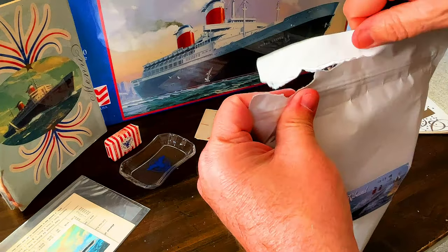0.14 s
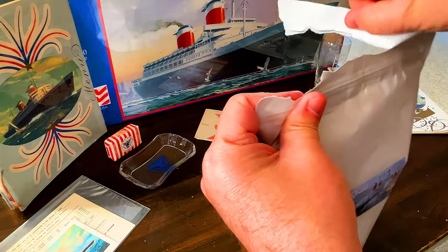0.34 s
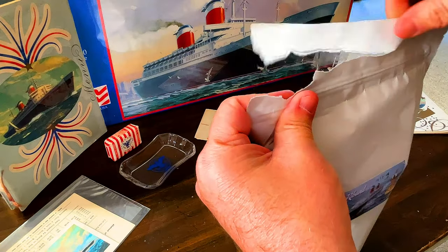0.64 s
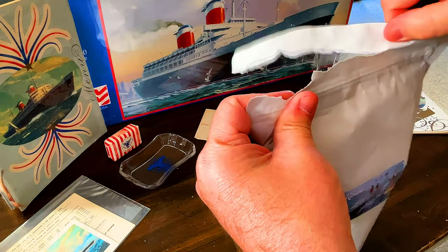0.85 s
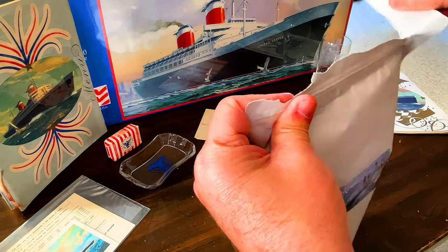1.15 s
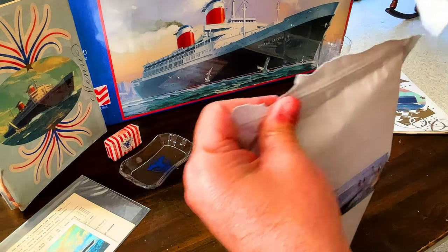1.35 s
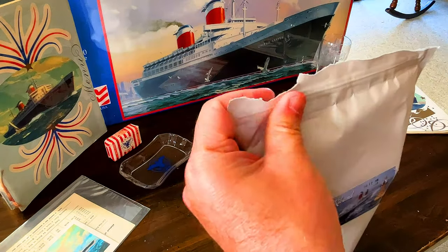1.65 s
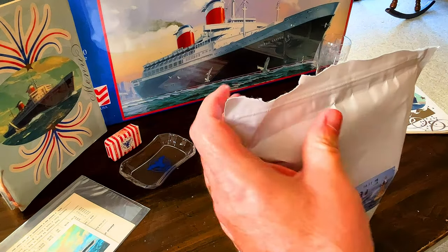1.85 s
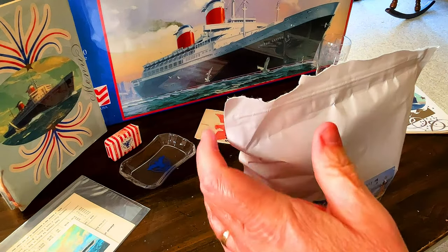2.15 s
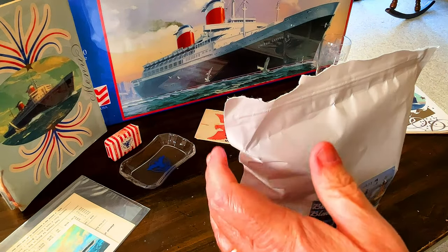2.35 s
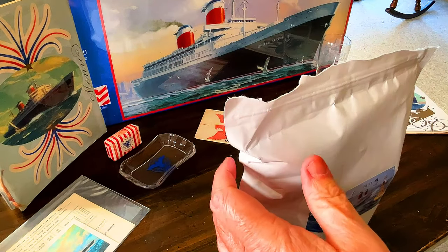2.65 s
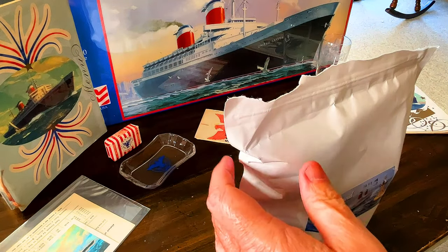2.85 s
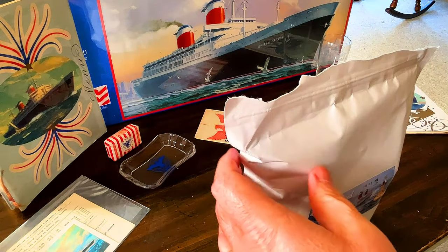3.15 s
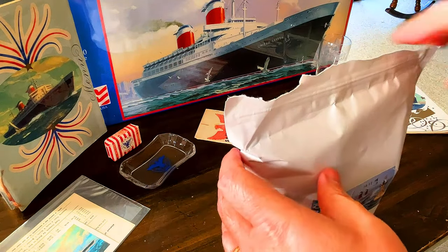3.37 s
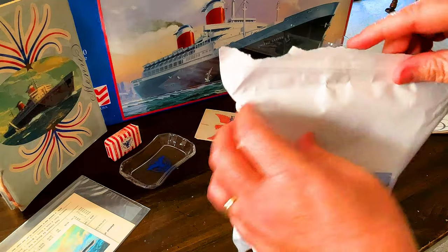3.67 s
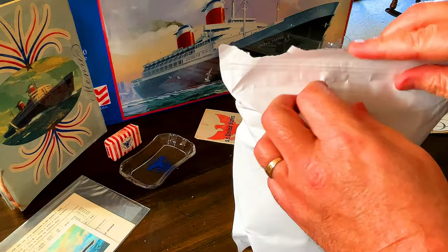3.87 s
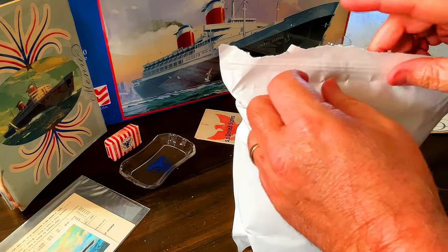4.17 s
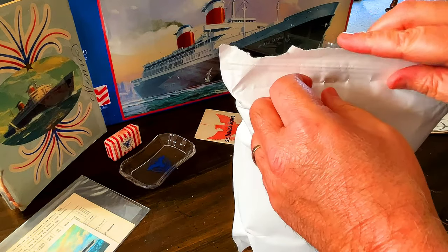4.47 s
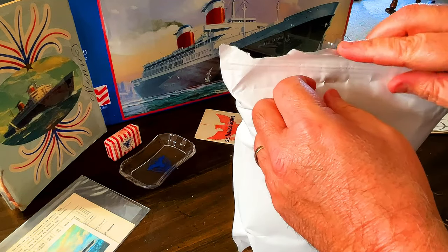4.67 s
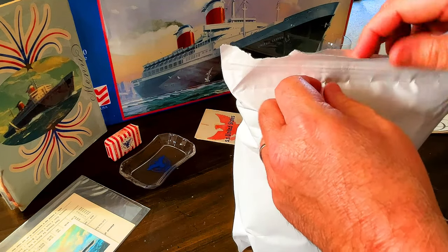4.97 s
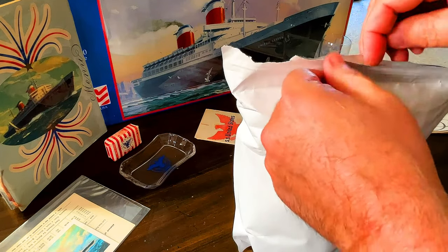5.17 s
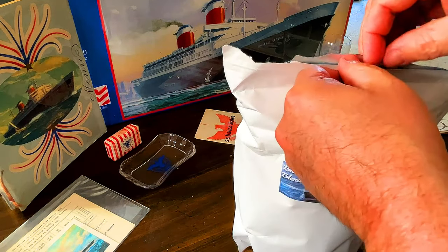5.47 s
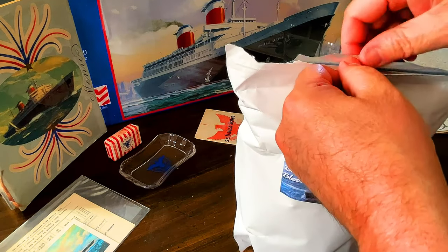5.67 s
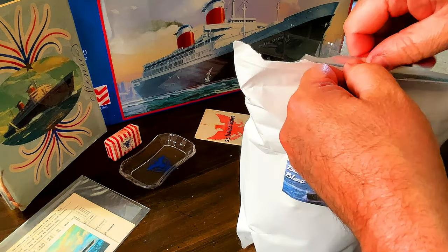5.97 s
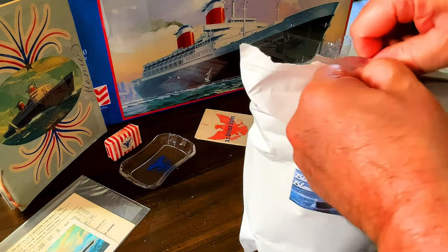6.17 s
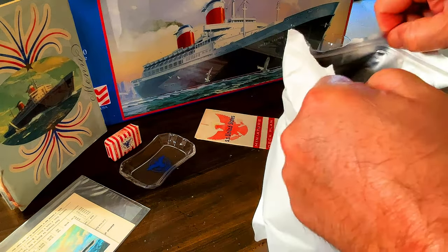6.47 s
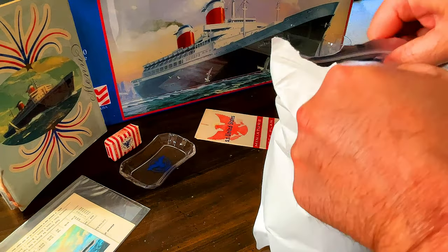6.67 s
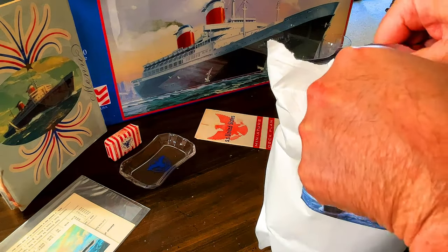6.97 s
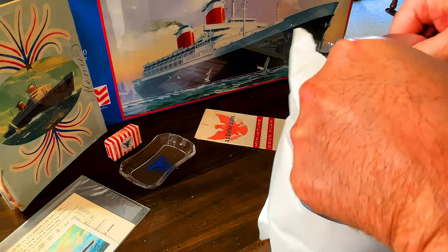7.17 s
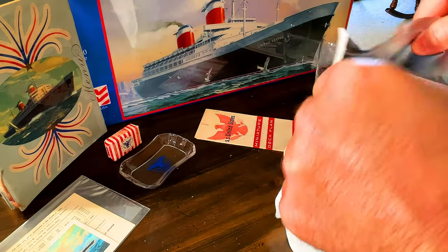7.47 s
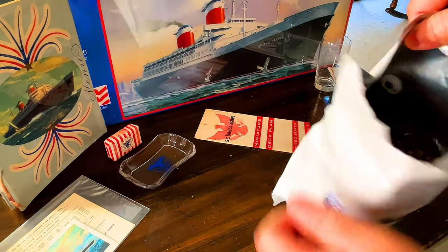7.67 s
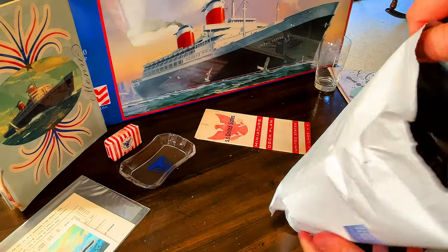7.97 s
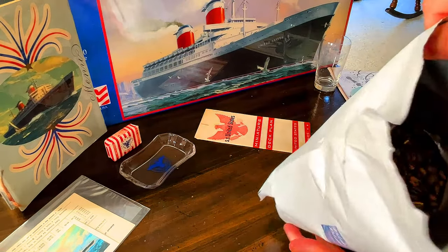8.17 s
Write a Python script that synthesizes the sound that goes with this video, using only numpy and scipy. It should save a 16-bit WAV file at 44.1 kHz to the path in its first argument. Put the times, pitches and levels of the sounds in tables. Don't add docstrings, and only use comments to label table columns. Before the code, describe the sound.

Close, dry tearing of a foil-lined plastic bag, sharp crackling snaps, a quiet pause with faint hum, then rustling and hard crinkly pulls.

```python
import sys
import numpy as np
from scipy import signal
from scipy.fft import rfft, irfft
from scipy.io import wavfile

SR = 44100
rng = np.random.default_rng(int(sys.argv[2]) if len(sys.argv) > 2 else 0)


def int16_out(signal):
    q = np.round(np.clip(np.atleast_2d(signal).T, -1, 1) * 32767)
    wavfile.write(sys.argv[1], SR, q.astype(np.int16))


def to_linear_factor(level_db):
    exponent = np.asarray(level_db, float) / 20
    return 10 ** exponent


N = 366762
SPLIT_HZ, AIR_HZ = 5130, 11800

# f/Hz, level/dB (per Hz)
FOIL_SPECTRUM = [(250, -33.5), (420, -2.5), (544, -17.5), (644, -7), (929, -15), (1120, -1.5), (1340, -1),
                 (2020, -4.5), (2790, -2), (5220, -3), (10700, -6.5), (15000, -21.5), (16100, -14)]
# f/Hz, level/dB (per Hz)
WALL_SPECTRUM = [(24, -56), (40, -16.5), (190, -0.5), (259, -2.5), (307, -7), (350, -4.5), (520, -21.5),
                 (680, -44), (1140, -120)]
# f/Hz, level/dB (per Hz)
HUM_SPECTRUM = [(15, -48), (25, -21.5), (75, 1), (167, -16), (224, -25), (261, -13), (344, -27.5),
                (493, -39), (913, -50), (1500, -38), (1950, -72.5), (3300, -120)]
# t/s, level/dB
HUM_LEVEL = [(0, -46.5), (.22, -73.5), (.35, -52), (.75, -63), (1.0, -51), (1.55, -51), (1.74, -71.5),
             (1.85, -61), (2.6, -55.5), (4.1, -48.5), (5.9, -42), (6.6, -59.5), (7.2, -48.5), (7.72, -83),
             (7.85, -52), (8.0, -77), (8.1, -47.5), (8.32, -62)]
# t/s (full), fade/s, grain level/dB, brightness/dB, loudest patch f/Hz
RIPS = [(0, 0.046, -41, -1, 2440), (0.328, 0.25, -21.5, -0.5, 2490), (.806, 0.037, -58, 16, 1550),
        (0.902, .05, -52, -7.5, 1690), (0.966, 0.13, -19.5, 0, 2320), (4.374, 0.049, -52, -4.5, 4400),
        (4.562, 0.066, -50, -31.5, 2710), (4.743, 0.043, -48.5, -3.5, 3000), (0.525, .13, -48.5, -12, 1480),
        (6.194, 0.089, -41, -15, 1190), (5.354, 0.035, -51, -5.5, 2800), (5.863, 0.1, -45, -11, 2750),
        (8.05, 0.04, -31.5, -32, 1976)]
# t/s (full), fade/s, grain level/dB, brightness/dB, loudest patch f/Hz
PULLS = [(1.021, .25, -16.5, 0, 2630), (1.099, 0.13, -20.5, 0, 2200), (1.256, 0.089, -21, 5, 2250),
         (1.373, 0.06, -23.5, -0.5, 1690), (1.456, 0.19, -40, -22, 2200), (1.534, 0.13, -32.5, -20, 2300),
         (3.353, .1, -40, -7, 2000), (7.0, 0.16, -58, -35, 1300), (3.414, 0.46, -33, -3, 3990),
         (4.037, 0.17, -33, -1, 2740), (5.026, 0.25, -52, 2.5, 1450), (5.189, 0.23, -38.5, -6.5, 2670),
         (6.406, 0.29, -27.5, -6.5, 2500), (6.507, 0.2, -30.5, -4, 2920), (6.855, 0.12, -47, -42, 1740),
         (6.88, 0.18, -45, -21, 1660), (7.203, 0.4, -32, -10, 2310), (7.315, 0.21, -19, -15, 1240),
         (7.406, 0.26, -30, -0.5, 2480), (7.832, 0.085, -32.5, -14.5, 2500), (8.119, 0.09, -35, -22, 2050)]
# t/s (full), fade/s, grain level/dB, brightness/dB, loudest patch f/Hz
SLIDES = [(.1, 0.13, -81, 5, 2650), (0.663, 0.21, -90, -14, 3050), (3.346, 0.08, -50, 2, 2700),
          (3.521, 0.33, -35.5, -5.5, 2130), (3.86, 0.15, -47, -3, 2900), (4.11, 0.1, -44.5, 9.5, 3540),
          (4.836, 0.15, -54.5, -5, 3100), (5.078, .08, -43, -6.5, 3840), (5.246, 0.05, -43.5, 7, 2440),
          (5.64, 0.19, -51.5, -1, 3700), (5.956, 0.1, -44.5, 1.5, 3420), (6.072, 0.14, -46.5, -4, 1450),
          (6.107, 0.18, -42.5, -1.5, 3330), (6.268, 0.36, -40, -13, 1330), (6.628, 0.049, -50, 2.5, 3560),
          (7.513, 0.21, -34, -9.5, 2460), (4.607, 0.23, -68, -27, 2880), (5.797, 0.1, -52, -22, 1300),
          (4.009, 0.053, -44, -16, 1300), (8.173, .5, -42.5, -7.5, 3050)]
# t/s (full), fade/s, grain level/dB, brightness/dB, loudest patch f/Hz
SKIDS = [
    (3.17, 0.13, -42, -2, 4200),
    (5.446, 0.22, -47, -4.5, 3350),
    (5.33, 0.15, -68, -33, 1800),
    (6.727, 0.028, -73, 21.5, 3500),
    (5.88, 0.35, -49, -18.5, 1450),
    (7.671, 0.093, -35.5, -10, 3200),
    (7.931, 0.059, -63.5, -26, 2930),
]
# swell/s, bend of fade/1, wall over grain level/dB, brightness lost/dB per dB below full
STROKE_HABITS = [
    (0.038, 1.87, -5, .5),
    (0.11, 1.21, -6.5, 0),
    (0.071, 5.2, -13, -0.14),
    (0.031, 8.3, -32, 1.2),
]
# t/s, peak level/dB, pitch f/Hz, sizzle level/dB
TICKS = [(0.2944, -23.5, 1736, -42.5), (0.4921, -23, 1970, -28.5), (.5333, -38, 1410, -31),
         (0.8054, -13.5, 1220, -9.5), (0.8512, -22, 3250, -43), (.9383, -16, 3020, -4),
         (1.1667, -31.5, 2260, -9.5), (1.203, -4.5, 2665, -19), (1.2843, -1.8, 1980, -4.5),
         (1.4923, -24, 2010, -40.5), (1.6534, -21.5, 1634, -35), (3.7138, -8.5, 1466, -11),
         (5.1507, -9, 3750, -10), (5.175, -8, 2440, -26.5), (5.8371, -9.5, 1880, -24),
         (6.1342, -16, 3550, 7), (6.1445, -11, 3170, 1.5), (6.444, -12, 2970, -25),
         (6.8784, -5, 4140, -3.5), (7.1926, -13, 1080, -28.5), (7.7607, -24, 2040, -39),
         (7.799, -2, 2600, -9), (7.828, -26, 1970, -29.5), (7.8388, -11.5, 2290, -26.5),
         (8.1223, -22, 1810, -14), (8.1483, 0.5, 2190, -7.5)]
# t/s, peak level/dB, pitch f/Hz, sizzle level/dB
CRACKS = [(.0028, -16.5, 2030, -28), (1.2234, -8, 4074, 1), (1.525, -13, 2200, -24.5),
          (3.5342, -3, 3550, -9.5), (3.5768, -8, 2730, -7.5), (5.163, -16.5, 2500, -24),
          (6.3342, -4, 1865, 3), (6.3696, -1.5, 4050, 0.5), (6.3988, -3, 3430, 2),
          (6.4264, 1.75, 3660, -9.5), (6.4693, -12.5, 2170, -21), (6.4915, -3, 3384, 2),
          (6.5236, -9, 3840, -1), (6.9384, -22.5, 1664, -23), (7.1002, -25.5, 1990, -48.5),
          (7.1851, -1, 2250, -5), (7.5374, -15.5, 2440, -35), (7.8028, -18, 2430, -21)]
# t/s, peak level/dB, pitch f/Hz, sizzle level/dB
POPS = [(1.3762, -4, 1110, -18), (1.6223, -28.5, 1260, -47), (3.8856, -34, 5670, 12),
        (5.118, -9, 1070, -21), (5.1388, -14.5, 1430, -17), (5.183, -3, 3820, -23.5),
        (5.46, -43, 6480, 24.5), (6.7941, -32.5, 1420, -40.5), (6.8835, -15.5, 1080, -23),
        (7.015, -43.5, 1153, -34), (7.2913, -7, 1266, -14), (7.299, -1.5, 1208, -15),
        (7.3656, -4.5, 2356, -12.5), (7.8206, -14.5, 3490, -11), (8.036, -21, 1870, -51),
        (8.0592, -29, 1800, -26)]
# t/s, peak level/dB, pitch f/Hz, sizzle level/dB
BUCKLES = [(0.2296, -54.5, 1250, -34), (0.314, -19.5, 2660, 1), (0.5514, -35, 3010, -36),
           (0.586, -32.5, 1470, -26.5), (0.8929, -13.5, 2320, -45), (1.1019, -16, 2980, -21),
           (1.1324, -33, 3750, 17.5), (1.5351, -0.7, 1755, -8.5), (1.806, -41, 1940, -46),
           (3.55, -0.5, 4420, -6.5), (4.0354, -5, 2140, 1), (4.0733, -18.5, 3140, -11),
           (4.106, -20, 3100, -10), (4.563, -38.5, 2610, -39.5), (4.669, -42, 3660, -32),
           (5.008, -22.5, 1143, -20), (5.5672, -26, 3460, 0.5), (5.6576, -27.5, 1290, -6.5),
           (6.353, -9.5, 2770, -13), (6.488, -14.5, 2970, -32.5), (7.1743, -7.5, 1700, -22),
           (7.3295, -6, 1540, -24), (7.3897, -8.5, 6800, 8.5), (7.5932, -35.5, 2670, 6),
           (8.0788, -13, 1860, -38), (8.0889, -19.5, 1540, -14)]
# thump level/dB, thump lost/dB per dB of crease strength, t60/s
CREASE_HABITS = [
    (-21.5, 0.57, 0.019),
    (-19.5, 0.36, .034),
    (-11.5, 0.4738, .016),
    (-9.5, 0.2926, .038),
]
# t/s, peak level/dB, pitch f/Hz, sizzle level/dB, t60/s
TOUCHES = [(.18, -72, 2970, 18.5, 0.16), (.72, -60, 3115, -27, 0.2), (2.079, -58, 3630, -1.5, 0.063),
           (2.124, -60.5, 2670, -42.5, .17), (2.546, -57.5, 3980, -24, .3), (2.566, -54.5, 2670, -49, 0.18),
           (2.797, -58, 2110, -43.5, 0.17), (2.92, -63.5, 3520, -10, 0.035), (2.975, -64.5, 2344, -6, 0.15),
           (3.122, -52.5, 2860, -43, 0.25), (7.649, -48, 960, -43, 0.024), (7.998, -58, 1300, -51, 0.03)]
# t/s, level/dB
SQUEAK_LEVEL = [
    (3.30, -80),
    (3.34, -44),
    (3.42, -33.5),
    (3.50, -34.5),
    (3.54, -80),
]


def rms_one(x):
    return x / np.sqrt(np.mean(x ** 2) + 1e-20)


def in_time(rows):
    s, *columns = np.transpose(rows)
    return [np.interp(np.arange(N) / SR, s, c) for c in columns]


def response(points, size=4096):
    hz = np.maximum(np.arange(size // 2 + 1) * SR / size, 5)
    point_hz, point_db = np.transpose(points)
    db = np.interp(np.log(hz), np.log(point_hz), point_db)
    cepstrum = irfft(db * np.log(10) / 20)
    cepstrum[1:size // 2] *= 2
    cepstrum[size // 2 + 1:] = 0
    h = irfft(np.exp(rfft(cepstrum)))
    return h / np.sqrt(np.sum(h ** 2))


def coloured(x, points):
    return signal.fftconvolve(x, response(points))[:len(x)]


def passed(x, hz, kind):
    return signal.sosfilt(signal.butter(2, hz, kind, fs=SR, output="sos"), x)


def twice_low(x, hz):
    return passed(passed(x, hz, "low"), hz, "low")


def drift(rate):
    r = np.exp(-40 * np.pi * rate / SR)
    chance = rng.standard_normal(N // 20 + 2002)
    slow = signal.lfilter([1], [1, -2 * r, r * r], chance)[2000:]
    return np.interp(np.arange(N) / 20, np.arange(len(slow)), rms_one(slow))


def grains(per_s, spread_db):
    sizes = to_linear_factor(spread_db * np.minimum(rng.exponential(1, N), 5)) * rng.choice([-1, 1], N)
    return rms_one(sizes * (rng.random(N) < per_s / SR))


def handling():
    span_db, swell_bend = 40, 1.11
    idle_db, idle_bright_db, idle_hz = -99, -11, 2200
    t = np.arange(0, N / SR + .01, .004)
    hum_db = -51 + .9 * (np.interp(t, *np.transpose(HUM_LEVEL)) + 49.5)
    power = to_linear_factor(2 * idle_db) + 0 * t
    bright, patch = power * idle_bright_db, power * np.log(idle_hz)
    wall = to_linear_factor(2 * hum_db)
    for table, (swell_s, bend, wall_db, dulling) in zip((RIPS, PULLS, SLIDES, SKIDS), STROKE_HABITS):
        for s, fade_s, grain_db, bright_db, hz in table:
            before = np.maximum((s - t) / swell_s, 0) ** swell_bend
            after = np.maximum((t - s) / max(fade_s, .01), 0) ** bend
            loss_db = span_db * (before + after)
            share = to_linear_factor(2 * (grain_db - np.minimum(loss_db, 200)))
            power = power + share
            wall = wall + share * to_linear_factor(2 * wall_db)
            bright = bright + share * (bright_db - dulling * loss_db)
            patch = patch + share * np.log(hz)
    return np.transpose([t, 10 * np.log10(power), bright / power, 10 * np.log10(wall), np.exp(patch / power)])


def torn_sheet():
    clump = to_linear_factor(2.1 * drift(81))
    crackle = to_linear_factor(-12.0) * grains(70, spread_db=4.0)
    return [coloured(grains(12000, spread_db=2.0) * clump + crackle, FOIL_SPECTRUM) for _ in range(2)]


def patch_ringing(sheets, strokes):
    grain_db, _, wall_db, patch_hz = in_time(strokes)
    gentle = np.clip(np.maximum((-44 - grain_db) / 14, (grain_db - wall_db - 3) / 8), 0, 1)
    body, power, edges = 0, 0, np.geomspace(480, SPLIT_HZ, 17)
    for k, (low, high) in enumerate(zip(edges, edges[1:])):
        centre_hz = np.sqrt(low * high)
        octaves = np.log2(centre_hz / patch_hz)
        band = passed(sheets[k % 2], [low, high], "band")
        near = np.exp(-(np.log2(centre_hz / strokes[:, 4]) / .22) ** 2)
        ridge_db = 6.0 * np.interp(np.arange(N) / SR, strokes[:, 0], near)
        gain = to_linear_factor(-3.0 * octaves ** 2 + gentle * (ridge_db - 1.2 * octaves ** 2))
        if high < 1000:
            gain = gain * to_linear_factor(1.1 * np.minimum(wall_db - grain_db, 0) + 8.5)
        body = body + gain * to_linear_factor(2.7 * drift(11)) * band
        power = power + gain ** 2 * np.mean(band ** 2)
    return body / np.sqrt(power)


def tearing_sizzle(sheets, sizzle_db, bright_db):
    top, edges = 0, [SPLIT_HZ, 7200, 9200, AIR_HZ]
    for k, shut in enumerate((-.2, .05, .25)):
        band = passed(passed(sheets[k % 2], edges[k:k + 2], "band"), edges[k + 1], "low")
        quiet_db = np.minimum(sizzle_db + 46.5, 0) + 0.35 * np.minimum(bright_db, 0)
        top = top + to_linear_factor(shut * quiet_db + 1.7 * drift(1.3)) * band
    air_db = 1.3 * np.clip(sizzle_db + 40, -14, 0)
    air = passed(passed(sheets[1], AIR_HZ, "high"), AIR_HZ, "high")
    top = top + to_linear_factor(air_db + 7.0) * air
    return top / np.std(passed(sheets[0], [SPLIT_HZ, AIR_HZ], "band"))


def wall_shudder(wall_db):
    loud = np.clip((wall_db + 51) / 10, 0, 1)
    wall = rms_one(coloured(rng.standard_normal(N), WALL_SPECTRUM)) * to_linear_factor(2.0 * drift(25))
    hum = rms_one(passed(coloured(rng.standard_normal(N), HUM_SPECTRUM), 170, "high"))
    hum = twice_low(hum, 750) + .9 * passed(hum, [255, 285], "band")
    return loud * wall + (1 - loud) * hum


def rip(strokes):
    grain_db, bright_db, wall_db, _ = in_time(strokes)
    sizzle_db = grain_db + bright_db
    sheets = torn_sheet()
    body = to_linear_factor(grain_db) * patch_ringing(sheets, strokes)
    top = to_linear_factor(sizzle_db) * tearing_sizzle(sheets, sizzle_db, bright_db)
    return body + top + to_linear_factor(wall_db) * wall_shudder(wall_db)


def room_tone(strokes):
    level_db, = in_time(HUM_LEVEL)
    rumble = rms_one(passed(coloured(rng.standard_normal(N), HUM_SPECTRUM), 170, "low"))
    level_db = level_db + 0.11 * (in_time(strokes)[2] + 50)
    return to_linear_factor(level_db + 2.0 * drift(40)) * rumble + to_linear_factor(-106.5) * rng.standard_normal(N)


def creases():
    rows = []
    for table, (thump_db, lost, t60) in zip((TICKS, CRACKS, POPS, BUCKLES), CREASE_HABITS):
        for s, db, hz, sizzle_db in table:
            rows.append((s, db, hz, sizzle_db, thump_db - lost * (db + 12.5), t60))
    return sorted(rows)


def snaps(rows, broad_db, crunch):
    size = SR // 6
    t, out = np.arange(size) / SR, np.zeros(N + size)
    foil, wall = response(FOIL_SPECTRUM), response(WALL_SPECTRUM)
    chance = rng.standard_normal((len(rows), 4, size))
    for (s, peak_db, hz, sizzle_db, thump_db, t60), (a, b, c, d) in zip(rows, chance):
        t60 = np.clip(t60, .006, .3)
        fall = to_linear_factor(-60 * t / t60) + to_linear_factor(-28.0 - 60 * t / (t60 * 7.5))
        burst = np.abs(b) ** crunch * fall * (1 - np.exp(-t / (0.011 * t60)))

        clicks = signal.fftconvolve(a * burst, foil)[:size]
        ring = passed(clicks, [hz / 1.206, hz * 1.232], "band")
        ring = ring + to_linear_factor(broad_db) * passed(clicks, hz / 4.0, "high")
        edge_hz = min(hz * 2.87, SPLIT_HZ * 1.16) * to_linear_factor(0.2 * min(sizzle_db + 22, 0))
        ring = twice_low(ring, edge_hz)

        top_hz = np.clip(17002.5 + 350 * sizzle_db + 150 * peak_db, 8000, 19000)
        sizzle = signal.fftconvolve(d * burst * to_linear_factor(-25.0 * t / t60), foil)[:size]
        sizzle = passed(sizzle, [SPLIT_HZ, top_hz], "band")

        push = c * (t / .006) * np.exp(-t / 0.0051)
        thump = passed(signal.fftconvolve(push, wall)[:size], 330, "low")

        at = max(round(s * SR), 0)
        for part, db in ((ring, 0), (sizzle, sizzle_db), (thump, thump_db)):
            out[at:at + size] += to_linear_factor(peak_db + db) * part / np.abs(part).max()
    return out[:N]


def near_echoes(x, t60, wet_db):
    t = np.arange(SR // 4) / SR
    wash = passed(rng.standard_normal(len(t)), 4500, "low") * to_linear_factor(-60 * t / t60) * (t > .003)
    return x + to_linear_factor(wet_db) * signal.fftconvolve(x, wash / np.sqrt(np.sum(wash ** 2)))[:N]


def fingertip_touches():
    rows = [(s, db, hz, sizzle_db, 2, t60) for s, db, hz, sizzle_db, t60 in TOUCHES]
    return snaps(rows, broad_db=-14.0, crunch=.7)


def squeak():
    level_db, = in_time(SQUEAK_LEVEL)
    lag = round(SR / 1760)
    gap = signal.lfilter([1], np.r_[1, np.zeros(lag - 1), -.66], grains(15000, spread_db=2.0))
    rub = rms_one(coloured(passed(gap, [1700, 12000], "band"), FOIL_SPECTRUM))
    return to_linear_factor(level_db) * rub * (level_db > -79.9)


def scene():
    strokes = handling()
    tearing = rip(strokes)
    room = room_tone(strokes)
    buckling = near_echoes(snaps(creases(), broad_db=-0.5, crunch=0.96), t60=0.2, wet_db=-26.5)
    return (tearing + room + buckling + fingertip_touches() + squeak())[None]


def top_cut(x):
    return signal.sosfilt(signal.butter(12, 16290, fs=SR, output="sos"), x)


def record(dry):
    steep = signal.cheby2(16, 70, 16150, fs=SR, output="sos")
    x = signal.sosfilt(steep, passed(dry, 45, "high"))
    return top_cut(np.clip(x, -1, 1))


dry = scene()
out = record(dry)
int16_out(out)
```